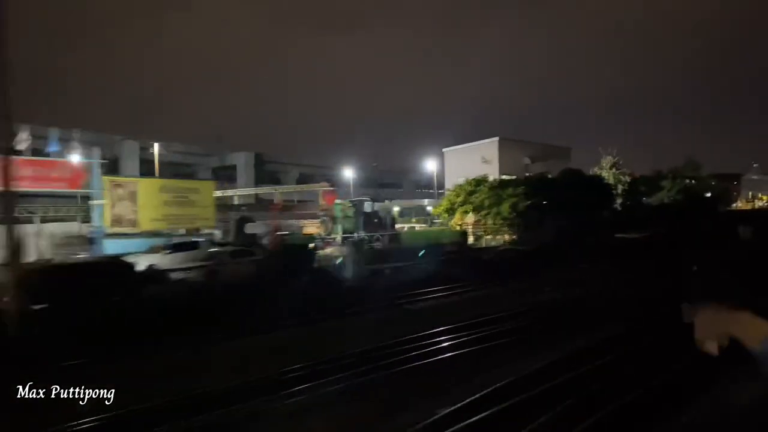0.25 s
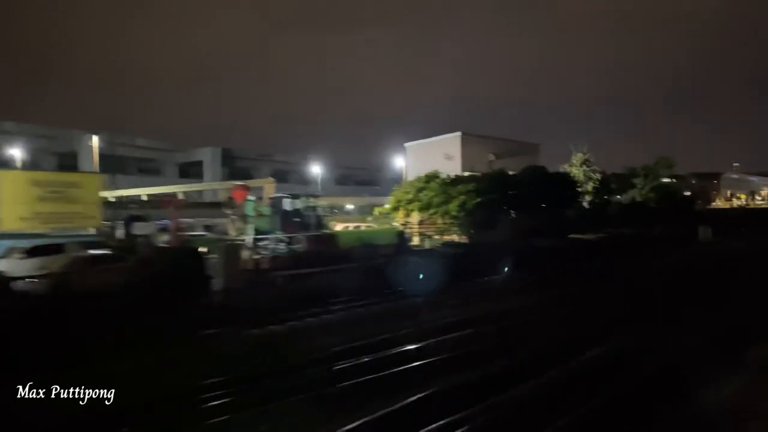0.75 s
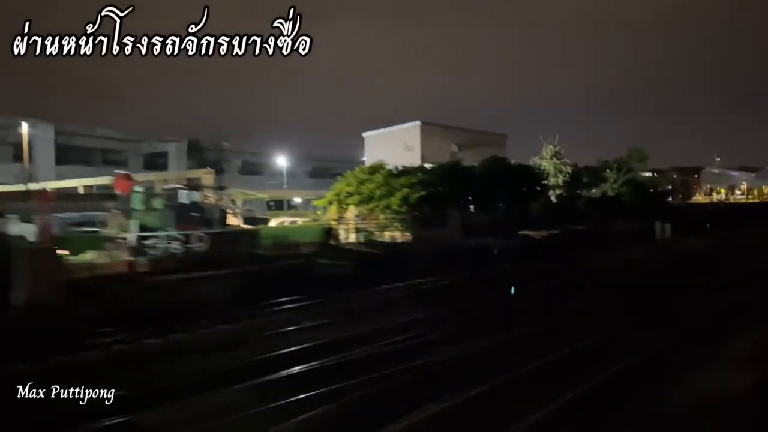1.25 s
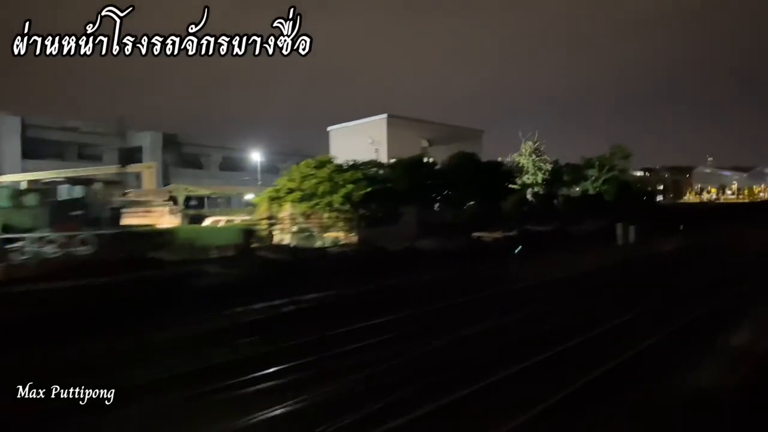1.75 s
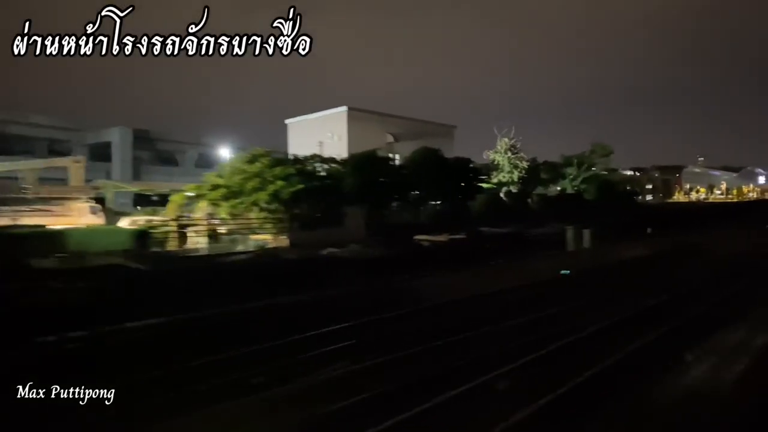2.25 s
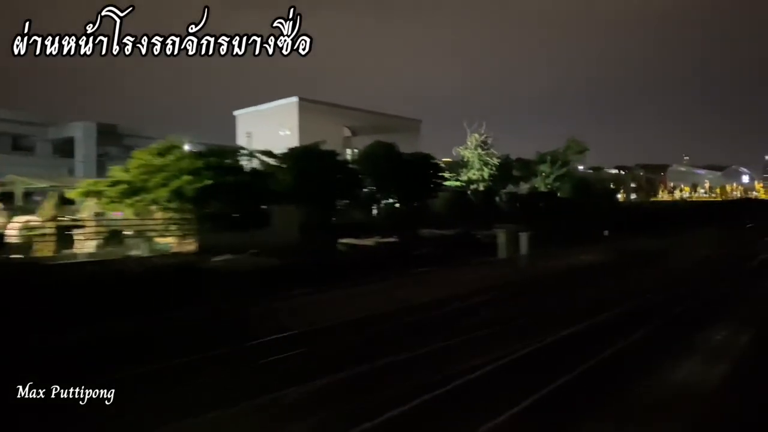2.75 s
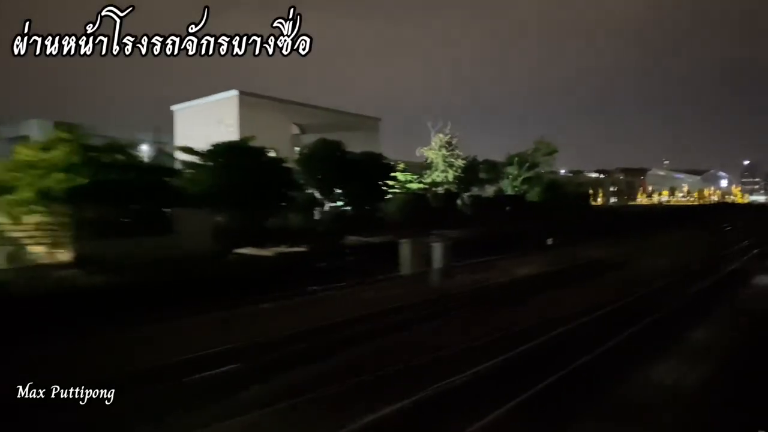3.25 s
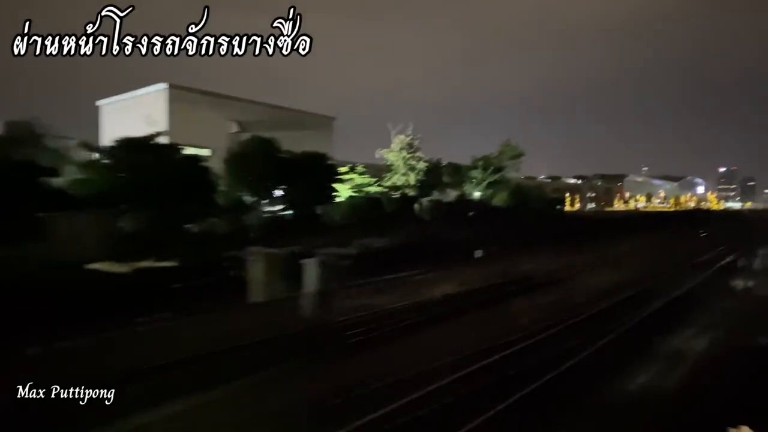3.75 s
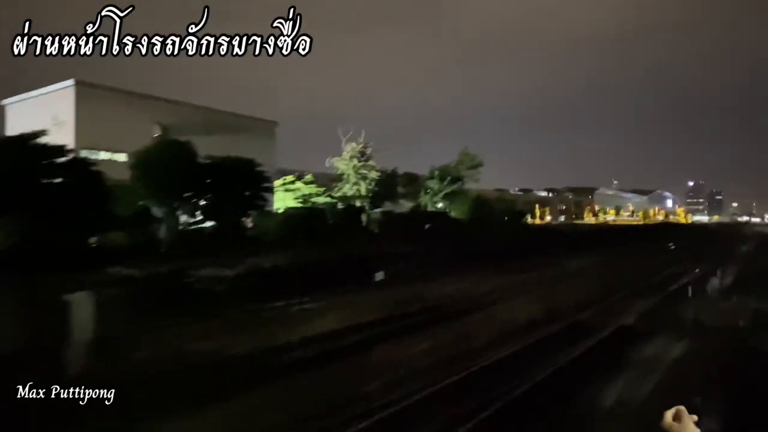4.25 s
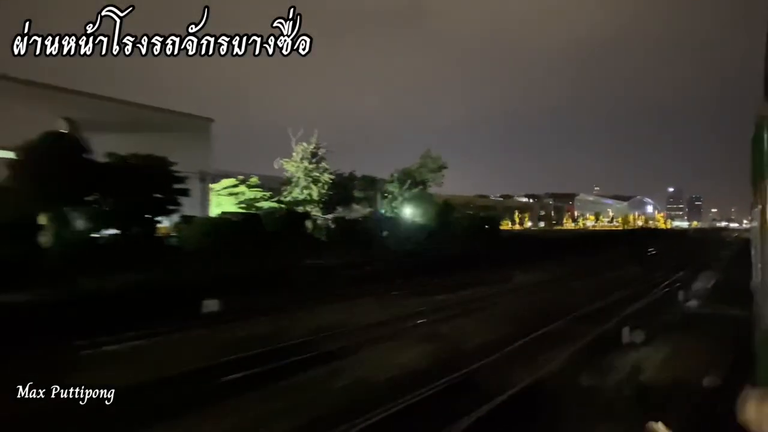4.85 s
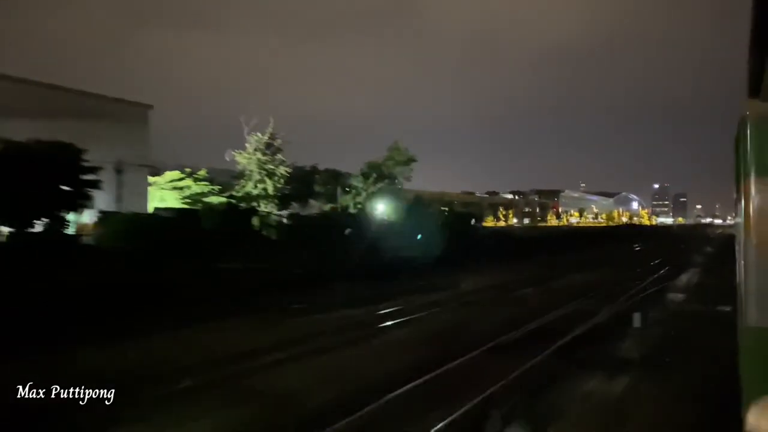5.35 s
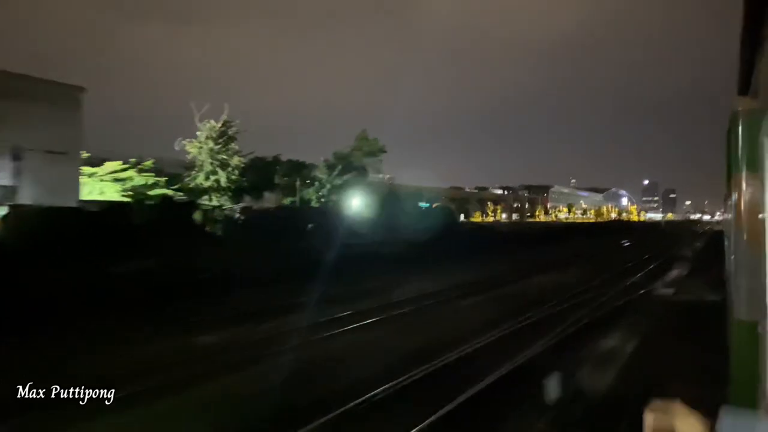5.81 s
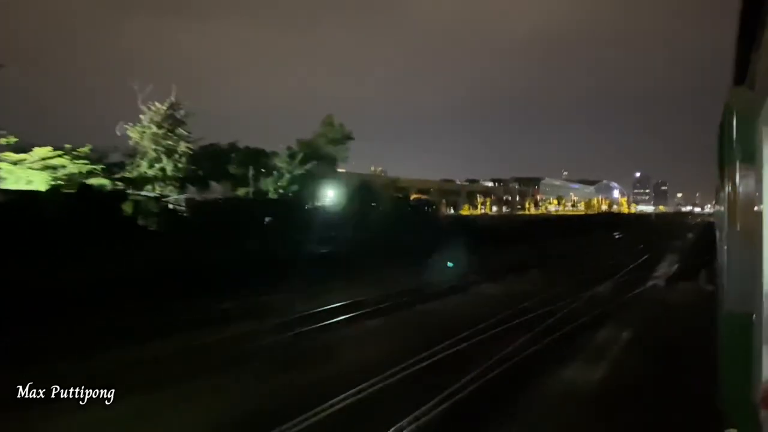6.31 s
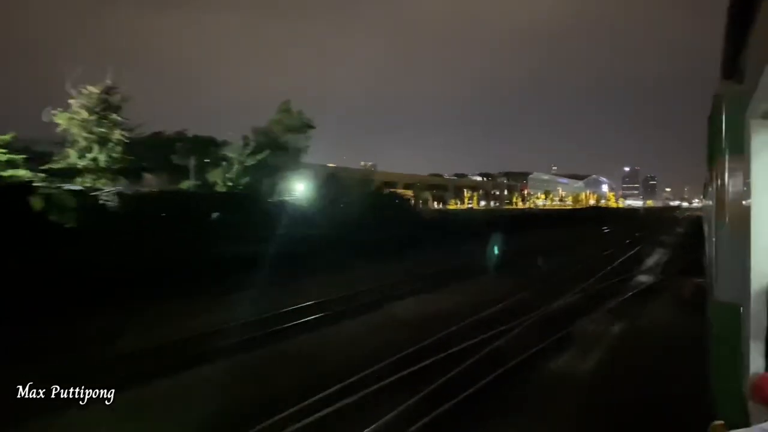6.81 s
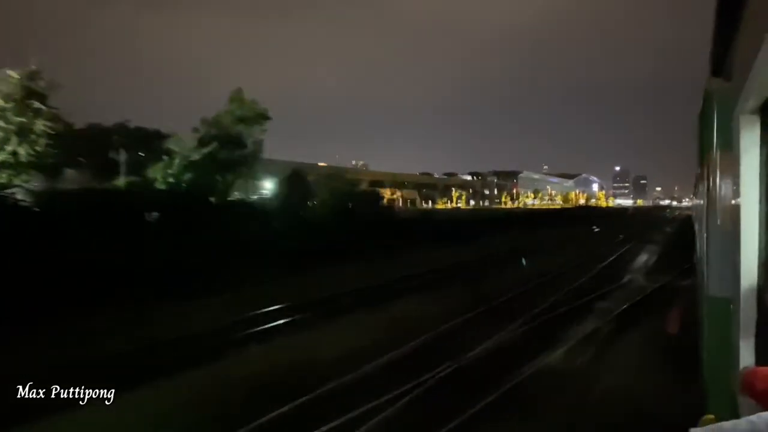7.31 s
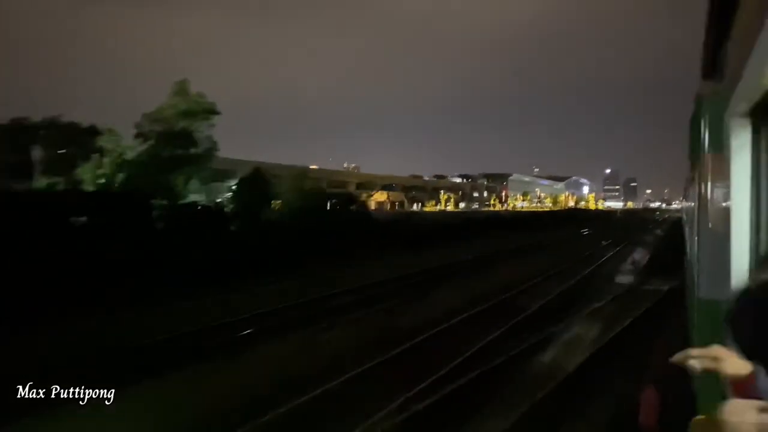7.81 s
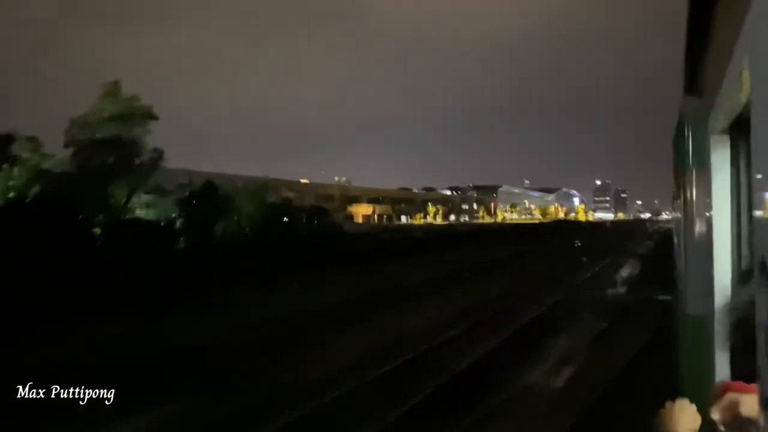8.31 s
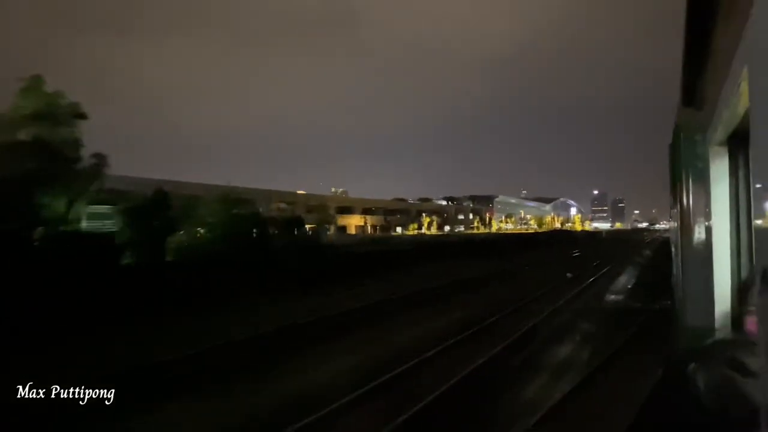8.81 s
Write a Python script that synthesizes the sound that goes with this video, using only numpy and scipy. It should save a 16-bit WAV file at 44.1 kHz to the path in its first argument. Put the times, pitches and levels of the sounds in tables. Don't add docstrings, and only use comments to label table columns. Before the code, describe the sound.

Continuous rumble and broadband hiss of rough train wheels, heard close outdoors from a carriage window. Deep buffeting and booming body panels dominate the first four seconds, broken by dull knocks, rattles and brief flange chirps. Then gusts thin out, leaving the rolling clearer, with fine gritty sprays, airy scrapes, panel lurches and scattered joint impacts, building to bright heavy clangs and renewed wind thumps at the end.

```python
import sys
import numpy as np
from scipy import signal
from scipy.io import wavfile
from scipy.ndimage import uniform_filter1d

SR = 44100
rng = np.random.default_rng(int(sys.argv[2]) if len(sys.argv) > 2 else 0)


def dump_mix(stems):
    frames = np.atleast_2d(stems).T
    limited = np.clip(frames, -1, 1)
    pcm = np.round(limited * 32767).astype(np.int16)
    wavfile.write(sys.argv[1], SR, pcm)


def convert_level_to_amplitude(level_db):
    exponent = np.asarray(level_db, float) / 20
    return 10 ** exponent


N = 399987
T = np.arange(N) / SR

# frequency in Hz, density in dB per Hz.
BUFFET_HZ_DB = [(22, -50), (35, -19), (50, -12), (68, 10), (90, 4.5), (130, -1.5), (250, -84)]
# frequency in Hz, density in dB per Hz.
EDDIES_HZ_DB = [(50, -33), (85, -13.5), (125, 1.5), (200, 0.5), (260, -3.5), (400, -19), (800, -76)]
# time in seconds, level in dB.
GUST_S_DB = [(0, -19), (.17, -18), (.3, -15.5), (.91, -18.5), (1.24, -25), (1.79, -18.5), (1.85, -15),
             (2.72, -20), (2.8, -25.5), (3.41, -23.5), (3.47, -17), (4.2, -18), (4.29, -26), (5.2, -31),
             (6.8, -28.5), (8.05, -35), (8.21, -23.5), (9.07, -32.5)]
# middle in seconds, extra level in dB.
PUFFS_S_DB = [(.58, 4), (1.05, 0.5), (1.52, 3.5), (2.27, -0.5), (3.05, 4.5), (3.7, 6), (4.52, 2), (4.83, 4),
              (5.55, 0), (5.66, 4), (5.9, 6), (6.18, 5.5), (6.52, 6.5), (6.74, 4), (6.95, 5), (7.07, 6),
              (7.3, 2), (7.75, 4), (8.55, 4), (8.95, 7)]
# start in seconds, peak in dB, pitch in Hz.
THUMPS = [(0.374, -6, 80.7), (0.554, 2.5, 72.7), (0.632, 1, 283), (1.419, -5, 136), (1.859, -3, 72),
          (2.191, -0.5, 105), (2.236, 3.5, 114), (3.443, 5, 78), (3.619, 5, 202), (3.838, 6, 204),
          (3.893, 3.5, 89), (4.09, 0, 328), (5.412, -6, 333), (5.51, -8, 334), (5.539, -10, 75.4),
          (5.542, -4, 284), (5.61, -15, 220), (5.707, -5.5, 258), (5.771, -9, 250), (6.52, -8, 307),
          (6.705, -17, 286), (7.199, -4, 317), (7.405, -21, 304), (7.465, -12, 322), (8.113, -11, 200),
          (8.609, 0.5, 302), (8.708, 2.5, 300), (8.772, 2, 308), (8.893, 0, 190), (8.966, 4.5, 188)]
# time in seconds, level in dB.
SHAKE_S_DB = [(0.0, -9), (0.15, -21), (0.91, -15), (1.24, -20), (4.19, -20), (4.22, -27), (4.77, -23),
              (4.8, -27.5), (6.24, -27), (6.39, -17), (7.07, -39), (7.12, -17.5), (7.38, -27.5),
              (7.43, -21.5), (7.53, -28.5), (8.01, -18.5), (8.92, -17.5), (9.07, -21)]
# middle in seconds, extra level in dB, length in seconds.
JOLTS = [(.01, -0.5, 0.085), (0.29, 6.5, 0.12), (.6, 0.5, 0.11), (0.737, 1.5, 0.25), (1.84, 12, 0.041),
         (2.076, 6, 0.062), (2.265, 4, 0.067), (2.423, 4.5, 0.026), (2.617, 4, 0.15), (2.822, 3.5, 0.1),
         (3.19, 1, 0.078), (3.446, 6, 0.031), (3.57, 3.5, 0.073), (3.886, 6.5, 0.056), (4.117, 3.5, 0.18),
         (4.515, 10, 0.061), (4.718, 7.5, 0.057), (4.904, 7, 0.042), (5.896, 3.5, 0.079), (6.493, 5, 0.098),
         (6.74, 11.5, 0.084), (6.953, 11, 0.2), (7.128, 6.5, 0.062), (7.47, 5, .04), (7.77, 2.5, 0.057),
         (8.2, 4.5, 0.1), (8.32, 4, 0.067), (8.45, 4, 0.12), (8.978, 0, 0.11)]
# frequency in Hz, width in Hz, level in dB.
PANELS = [(249.5, 24.3, -7), (305, 35, -2), (344.5, 19, -6.5)]
# frequency in Hz, density in dB per Hz.
ROAR_HZ_DB = [(200, -11), (330, -4.5), (420, 0), (520, -5.5), (700, -8.5), (1000, -17.5), (1500, -63),
              (3000, -55)]
# frequency in Hz, density in dB per Hz.
HISS_HZ_DB = [(500, 2), (900, 2), (1350, 3.5), (1600, 0), (1750, -4), (2050, 0.5), (2400, -4.5),
              (2700, -3.5), (4000, -8.5), (6000, -12.5), (8000, -17.5), (11500, -23), (13500, -20),
              (14300, -27), (15700, -29)]
# time in seconds, level in dB.
ROUGH_S_DB = [(0.0, -28), (0.7, -24.5), (0.93, -27), (1.39, -27.5), (2.95, -26.5), (3.16, -26), (5.35, -28),
              (7.15, -30.5), (7.63, -30), (9.07, -24.5)]
# time in seconds, level in dB.
EXPOSURE_S_DB = [(0, -29.5), (1.3, -33), (2.2, -29.5), (3, -32), (3.8, -30), (4.25, -33), (5.2, -31.5),
                 (6.5, -29), (9.07, -29)]
# frequency in Hz, width in Hz, level in dB.
WHEEL_MODES = [(958, 230, 8.5), (1480, 320, 6.5), (2087, 210, 4.5), (2687, 420, 1.5), (3480, 310, -4.5),
               (4420, 920, -8.5)]
# start in seconds, peak in dB.
GRIT_S_DB = [(0.1231, -31), (0.2473, -31), (0.394, -40), (0.4519, -38), (0.6594, -40), (1.5509, -37),
             (1.6302, -40), (1.8711, -34), (2.0632, -40), (2.2638, -28), (2.388, -36), (2.4833, -34),
             (2.7816, -32), (2.8674, -40), (3.3458, -35), (4.6992, -33), (4.8184, -32), (5.1552, -34),
             (5.3577, -35), (5.4879, -34), (5.8601, -31), (5.904, -39), (6.2642, -35), (6.33, -39),
             (6.3814, -31), (6.5296, -30), (6.6523, -27), (6.8324, -41), (6.8942, -37), (6.9546, -32),
             (7.0309, -29), (7.1621, -30), (7.2379, -38), (7.3253, -37), (7.3677, -34), (7.4589, -36),
             (7.5522, -37), (7.669, -37), (7.9628, -28), (8.3724, -40), (8.7745, -31), (8.8598, -31),
             (8.9077, -41), (8.9685, -23), (9.0114, -34)]
# middle in seconds, length in seconds, level in dB.
SCRAPES = [
    (.8, .2, -60),
    (2.56, .2, -44),
    (4.846, 0.17, -45),
    (7.196, 0.15, -39.5),
    (7.434, 0.21, -43),
]
# start in seconds, length in seconds, wheel mode in Hz, level in dB,
# left minus right in dB.
SQUEALS = [(0.954, .055, 7490, -44, 0), (1.145, 0.053, 6560, -33.5, -5), (2.055, .07, 7470, -41, 1),
           (2.15, .07, 7490, -43, -4), (2.385, 0.11, 6350, -28.5, -5), (2.386, .12, 12680, -42, -2),
           (3.728, .044, 6600, -38, 1), (4.536, 0.078, 7460, -39, -2), (4.64, 0.061, 6470, -40, -2),
           (4.977, .05, 7420, -35.5, -1), (5.066, .04, 2070, -40, 0), (5.136, 0.038, 6840, -36, -2),
           (5.15, .13, 3990, -44, 4), (5.17, .033, 15200, -46, 8), (6.983, .022, 12500, -26, 1),
           (7.018, 0.1, 9960, -34.5, 2), (7.193, 0.043, 1330, -27.5, -2), (7.33, 0.07, 13600, -36, 0),
           (7.786, 0.032, 6020, -37, 0), (8.076, 0.053, 2369, -33, 3.5), (8.085, .03, 15450, -42, 0),
           (8.086, .03, 6530, -37, 5), (8.094, .035, 6800, -35, 5)]
# start in seconds, peak in dB, low, middle and high mode in Hz.
CLANGS = [(0.4529, -18, 2270, 2600, 4150), (0.6504, -25, 2050, 2700, 4010), (1.6372, -24, 1980, 2740, 4490),
          (2.0448, -16, 1900, 3100, 4020), (2.2594, -13, 1880, 2850, 3980), (2.2844, -12, 2160, 2950, 4440),
          (4.7012, -25, 2050, 2900, 3680), (4.7247, -17, 2030, 2910, 3620), (5.6396, -22, 2020, 2540, 4690),
          (6.5271, -22, 2030, 2520, 3980), (6.9262, -21, 2300, 2720, 4300), (7.1167, -17, 1790, 2730, 4050),
          (7.9638, -25, 2030, 2640, 4500), (8.3706, -14, 2070, 2700, 3900), (8.7745, -7, 2200, 2400, 4330),
          (8.7894, -14, 2290, 2600, 3650), (8.967, -9, 2290, 2800, 3760), (8.9874, -13, 1970, 3100, 4170)]
CLANG_MODE_DB = [-11.5, -16, -17]
CLANG_T60_S = [0.12, 0.15, .1]
# start in seconds, peak in dB, ring in Hz.
TAPS = [(0.032, -14, 467), (0.259, -8, 431), (0.385, -13, 455), (0.842, -16, 600), (1.379, -15, 431),
        (1.792, -9, 440), (2.375, -15, 579), (2.557, -11, 619), (2.601, -11, 436), (2.793, -7, 468),
        (2.872, -6, 450), (2.932, -8, 434), (3.057, -8, 452), (3.248, -9, 448), (3.423, -9, 463),
        (4.248, -16, 550), (4.704, -9, 640), (4.89, -11, 450), (4.948, -21, 600), (5.015, -12, 433),
        (5.406, -5, 466), (6.415, -14, 530), (6.485, -12, 620), (6.512, -8, 940), (6.939, -8, 575),
        (7.197, -14, 431), (7.497, -16, 519), (8.315, -10, 483), (8.895, -9, 433)]
# start in seconds, peak in dB, ring in Hz,
# dry snap in dB.
KNOCKS = [(.445, -4.5, 634, -12), (.542, -18, 605, 11), (.643, -11, 620, -3), (1.831, -18, 643, -1),
          (2.191, -18, 690, 3), (2.244, -8, 616, 2), (2.266, -22, 875, -5), (2.695, -21, 605, -8),
          (3.194, -4.5, 574, -7), (3.726, -16, 630, 0), (3.896, -8, 663, -3), (4.09, -7.5, 826, -11),
          (4.278, -16.5, 634, 12), (4.409, -21.5, 560, 10), (4.499, -8.5, 906, 0.5), (4.695, -9, 646, 0),
          (5.59, -20, 680, 3), (5.64, -21.5, 900, 9), (5.719, -20, 995, 4), (6.323, -10.5, 1020, -5),
          (6.524, -2, 973, -7), (6.925, -6, 1026, -19), (7.119, -6, 820, 0), (7.468, -12, 610, 2),
          (8.372, -8, 625, -4), (8.778, -5, 810, -2), (8.981, -3.5, 700, -2)]
# start in seconds, level in dB, rise in seconds,
# rattling in seconds.
JOINTS = [(.445, -26, 0.0073, 0.012), (0.65, -28.5, 0.0031, 0.055), (1.41, -37.5, .005, 0.036),
          (1.634, -31, .0025, 0.011), (2.045, -33.5, 0.0043, 0.013), (2.242, -23, 0.025, 0.029),
          (2.8, -41, .0067, 0.017), (3.0, -37, 0.012, .12), (3.435, -38, 0.0036, 0.013),
          (3.65, -38.5, 0.018, .15), (4.087, -44, .003, 0.01), (4.5, -34.5, .004, .026),
          (4.696, -26.5, 0.013, 0.043), (5.13, -38.5, .02, .084), (5.35, -36.5, .0046, 0.042),
          (5.639, -42, .0015, .003), (5.77, -34, 0.02, 0.094), (6.228, -46, .004, .018),
          (6.524, -33.5, .003, 0.035), (6.7, -39, .013, 0.033), (6.88, -40, .005, 0.016),
          (6.928, -31, 0.0034, 0.024), (7.04, -33, .011, .026), (7.118, -24.5, 0.015, 0.041),
          (7.34, -30, 0.024, 0.031), (7.962, -31.5, 0.0032, 0.0078), (8.15, -32, .012, 0.027),
          (8.371, -24.5, 0.0021, 0.005), (8.771, -21.5, 0.0023, 0.011), (8.966, -23.5, 0.003, 0.063)]
# frequency in Hz, density in dB per Hz.
CLATTER_HZ_DB = [(200, -37), (700, 8.5), (1500, 0.5), (2500, -2.5), (4500, -5.5), (7000, -10),
                 (11000, -16.5), (15700, -20)]
# frequency in Hz, likeness from 0 to 1.
LIKENESS = [(60, 1), (200, 0.78), (330, 0.78), (500, 0.46), (1200, 0.36), (2700, 0.28), (4200, 0.55),
            (6200, 0.071), (7000, 1), (8000, 0.95), (16000, 1)]
# frequency in Hz, lead in radians.
LEAD_HZ_RAD = [(0, 0), (1300, -.1), (1720, 1.2), (3400, .2), (6900, 0), (16000, -13.83)]
# frequency in Hz, left minus right in dB.
BALANCE_HZ_DB = [(60, -0.5), (150, 1), (380, 2), (950, 0.5), (2380, 1.5), (5980, 3.5), (15000, -1.5)]

USUAL_DB = -22
PUFF_S = 0.12
EDGE_HZ = 15830
SQUEAL_WAVER_HZ, SQUEAL_OCTAVE_DB = 7, -24
ECHO_DB, ECHO_T60_S = -5, 0.32
GRIT_DB, GRIT_RISE_S, GRIT_T60_S = -5, 0.004, 0.19
TAP_DB, TAP_T60_S = -2.5, 0.076
KNOCK_T60_S = 0.1
RATTLE_T60_S, RATTLE_T60_PER_HOLD = 0.21, 3.4
RING_DB, RING_LOSS_DB_PER_S = 3.5, 382
TREBLE_HZ, TREBLE_LAG = 3600, 0.41


def evened(x):
    return x / np.sqrt(np.mean(x ** 2) + 1e-20)


def read(points, hz):
    f, value = np.transpose(points)
    return np.interp(np.log(hz + 1), np.log(f + 1), value)


def along(curve):
    return np.interp(T, *np.transpose(curve))


def bumps(rows):
    t = T[::64]
    swell_db = sum(db * np.exp(-((t - s) * 2 / length_s) ** 2) for s, db, length_s in rows)
    return np.interp(T, t, swell_db)


def flutter(hz):
    chance = rng.standard_normal(4096)
    return evened(np.interp(T * hz * 2, np.arange(len(chance)), chance))


def level(db, gust=0., puff=0., shake=0., jolt=0.):
    gust_db = gust * (along(GUST_S_DB) - USUAL_DB)
    puff_db = puff * bumps([(s, extra_db, PUFF_S) for s, extra_db in PUFFS_S_DB])
    shake_db = shake * (along(SHAKE_S_DB) - USUAL_DB)
    return convert_level_to_amplitude(db + gust_db + puff_db + shake_db + jolt * bumps(JOLTS))


def resonances(modes):
    def spectrum_db(hz):
        power = sum(convert_level_to_amplitude(db) ** 2 / (1 + (2 * (hz - f) / width_hz) ** 2) ** 2 for f, width_hz, db in modes)
        return 10 * np.log10(power)
    return spectrum_db


def ports(spectrum_db, patchy_db, size=512):
    hop = size // 4
    frames, hz = N // hop + 5, np.fft.rfftfreq(size, 1 / SR)
    a, b, c, d, patches = rng.standard_normal((frames, len(hz), 5)).T
    patches = uniform_filter1d(patches, size=6, axis=0)
    patches = evened(uniform_filter1d(patches, size=10, axis=1))
    same = np.clip(read(LIKENESS, hz), 0, .999)[:, None]
    left = a + 1j * b
    right = same * left + np.sqrt(1 - same ** 2) * (c + 1j * d)
    path = np.exp(-1j * np.interp(hz, *np.transpose(LEAD_HZ_RAD))) / convert_level_to_amplitude(read(BALANCE_HZ_DB, hz))
    z = np.array([left, right * path[:, None]])
    z = z * convert_level_to_amplitude(spectrum_db(hz)[:, None] + patchy_db * patches)
    return evened(signal.istft(z, nperseg=size, noverlap=size - hop)[1][:, :N])


def add(mix, s, sound):
    part = mix[..., round(s * SR):][..., :sound.shape[-1]]
    part += sound[..., :part.shape[-1]]


def echoed(x):
    t = T[:SR // 4]
    tail = rng.standard_normal(len(t)) * convert_level_to_amplitude(-60 * t / ECHO_T60_S) * np.minimum(t / 0.02, 1)
    tail = tail / np.linalg.norm(tail)
    return x + convert_level_to_amplitude(ECHO_DB) * signal.oaconvolve(x, tail[None])[:, :N]


def struck(hz, t60_s, rise_s, chance):
    t = T[:SR // 5]
    turn = 2 * np.pi * chance[:2, None]
    second_hz = hz * (1.01 + 0.032 * chance[2])
    pair = np.sin(2 * np.pi * hz * t + 0.26 * turn) + 0.56 * np.sin(2 * np.pi * second_hz * t + turn)
    return pair * convert_level_to_amplitude(-60 * t / t60_s) * np.minimum(t / rise_s, 1)


def wind():
    deep = ports(lambda hz: read(BUFFET_HZ_DB, hz), 1.5, size=2048)
    deep = deep * level(db=-21.5, gust=1.05, puff=1.05, jolt=.15) * convert_level_to_amplitude(1.2 + 1.2 * flutter(hz=15))
    fast = ports(lambda hz: read(EDDIES_HZ_DB, hz), 1.8, size=2048)
    fast = fast * level(db=-21.0, gust=0.48, puff=0.5, shake=0.26, jolt=0.15)
    out = deep + fast * convert_level_to_amplitude(1.0 + 1.7 * flutter(hz=29.85))
    for s, db, hz in THUMPS:
        cycles = np.arange(int(2.5 * SR / hz)) / SR * hz
        bell = np.sin(np.pi * cycles / cycles[-1]) ** 2
        add(out, s, convert_level_to_amplitude(db - 5.0) * np.sin(2 * np.pi * cycles) * bell)
    return out


def body():
    boom = ports(resonances(PANELS), 1.0, size=2048)
    return boom * level(db=-27.0, shake=1.16, jolt=1.15) * convert_level_to_amplitude(1.96 + 2.4 * flutter(hz=29.06))


def rolling():
    uneven = flutter(hz=14)
    roar = ports(lambda hz: read(ROAR_HZ_DB, hz), 2.1, size=1024)
    roar = roar * convert_level_to_amplitude(along(ROUGH_S_DB)) * level(db=0.5, shake=0.2, jolt=0.68)
    roar = roar * convert_level_to_amplitude(4.5 + 0.67 * uneven + 1.12 * flutter(hz=80.6))
    hiss = ports(lambda hz: read(HISS_HZ_DB, hz), 1.58)
    hiss = hiss * convert_level_to_amplitude(2.5 + 0.46 * uneven + 0.61 * flutter(hz=89.8))
    narrow = [(f, width_hz * 0.29, db) for f, width_hz, db in WHEEL_MODES]
    singing = ports(resonances(narrow), 4.5, size=1024) * convert_level_to_amplitude(-8.5)
    fizz = ports(resonances([(11600, 6900, 0)]), 2.5, size=256) * convert_level_to_amplitude(-24.0 + 3.8 * flutter(hz=14.0))
    return roar + (hiss + singing + fizz) * convert_level_to_amplitude(along(EXPOSURE_S_DB)) * level(db=-0.26, jolt=0.052)


def grit():
    spray, t = np.zeros(N), T[:SR // 3]
    for s, db in GRIT_S_DB:
        add(spray, s, convert_level_to_amplitude(db + GRIT_DB - 60 * t / GRIT_T60_S) * np.minimum(t / GRIT_RISE_S, 1))
    return ports(resonances([(9600, 10000, 0)]), 2.5, size=256) * spray


def scrape():
    swell = sum(convert_level_to_amplitude(db) * np.exp(-((T - s) * 2 / length_s) ** 2) for s, length_s, db in SCRAPES)
    return ports(resonances([(11660, 600, 0)]), 3.1) * swell


def flanges():
    out, waver = np.zeros((2, N)), flutter(hz=60.0)
    paths = np.array([flutter(hz=54.0), flutter(hz=55.35)])
    for s, length_s, hz, db, pan_db in SQUEALS:
        at = round(s * SR) + np.arange(int(1.3 * length_s * SR))
        u = (T[at] - s) / length_s
        turn = 2 * np.pi * np.cumsum(hz + SQUEAL_WAVER_HZ * waver[at]) / SR + .3 * paths[:, at]
        turn[1] -= np.interp(hz, *np.transpose(LEAD_HZ_RAD))
        octave = convert_level_to_amplitude(SQUEAL_OCTAVE_DB) * np.cos(2 * turn) * (hz < EDGE_HZ / 2)
        fade = convert_level_to_amplitude(db + 4.0 - 15.6 * u ** 2 + 1.4 * paths[::-1, at])
        onset = np.minimum(u * length_s / 0.004, 1)
        add(out, s, (np.cos(turn) + octave) * fade * onset * convert_level_to_amplitude([[pan_db / 2], [-pan_db / 2]]))
    return out


def gear():
    out = np.zeros((2, N))
    for (s, db, *modes_hz), chances in zip(CLANGS, rng.random((len(CLANGS), 3, 3))):
        for hz, mode_db, t60_s, chance in zip(modes_hz, CLANG_MODE_DB, CLANG_T60_S, chances):
            add(out, s, convert_level_to_amplitude(db + mode_db) * struck(hz, t60_s, .003, chance) * convert_level_to_amplitude([[1], [-1]]))
    for (s, db, hz), chance in zip(TAPS, rng.random((len(TAPS), 3))):
        add(out, s, convert_level_to_amplitude(db + TAP_DB) * struck(hz, TAP_T60_S, 0.0019, chance))
    return out


def knocks():
    out, t = np.zeros((2, N)), T[:SR // 4]
    for (s, db, hz, snap_db), (detune, turn) in zip(KNOCKS, rng.random((len(KNOCKS), 2))):
        second_hz = hz * (1.08 + 0.108 * detune)
        pair = np.sin(2 * np.pi * hz * t) + 0.35 * np.sin(2 * np.pi * (second_hz * t + turn))
        ring = convert_level_to_amplitude(-9.0 - 60 * t / KNOCK_T60_S) * np.minimum(t / 0.0019, 1) * pair
        snap_turn = 2 * np.pi * np.cumsum(hz * (.7 + .5 * np.exp(-t / .004))) / SR
        snap = convert_level_to_amplitude(snap_db) * np.sin(snap_turn) * np.exp(-t / .0035) * np.minimum(t / .0008, 1)
        add(out, s, convert_level_to_amplitude(db) * (snap + ring) * convert_level_to_amplitude([[.7], [-.7]]))
    return out


def joints():
    burst, bright, ring, t = np.zeros(N), np.zeros(N), np.zeros(N), T[:SR // 2]
    for s, db, rise_s, hold_s in JOINTS:
        t60_s = RATTLE_T60_S + RATTLE_T60_PER_HOLD * hold_s
        ring_db = RING_DB - RING_LOSS_DB_PER_S * rise_s
        shape = convert_level_to_amplitude(db + 4.0 - 60 * np.maximum(t - rise_s - hold_s, 0) / t60_s)
        add(burst, s, shape * np.minimum(t / rise_s, 1))
        add(bright, s, shape * np.clip((t / rise_s - TREBLE_LAG) / (1 - TREBLE_LAG), 0, 1))
        add(ring, s, shape * np.minimum(t / 0.0012, 1) * convert_level_to_amplitude(ring_db - 200 * t))
    clatter = ports(lambda hz: read(CLATTER_HZ_DB, hz), 1.5, size=256) * convert_level_to_amplitude(0.83 * flutter(hz=148.7))
    dull = signal.sosfiltfilt(signal.butter(2, TREBLE_HZ, fs=SR, output="sos"), clatter)
    clatter = dull * burst + (clatter - dull) * bright
    return clatter + ports(resonances(WHEEL_MODES), 1.5, size=1024) * ring


def scene():
    air_and_body = wind() + body()
    running = rolling() + grit() + scrape() + echoed(flanges())
    return air_and_body + running + gear() + knocks() + joints()


def low_pass(x):
    return signal.sosfilt(signal.butter(12, 16910, fs=SR, output="sos"), x)


def record(dry):
    limited = dry / (1 + (dry / .97) ** 4) ** .25
    edge = signal.firwin(1023, EDGE_HZ, window=("kaiser", 9), fs=SR)
    return low_pass(signal.oaconvolve(limited, edge[None], "same"))


dry = scene()
out = record(dry)
dump_mix(out)
```